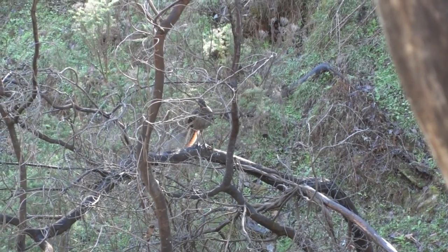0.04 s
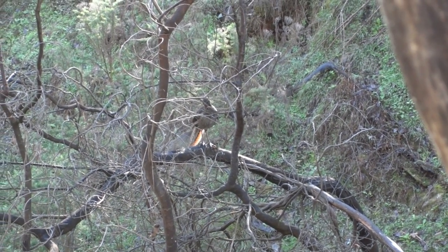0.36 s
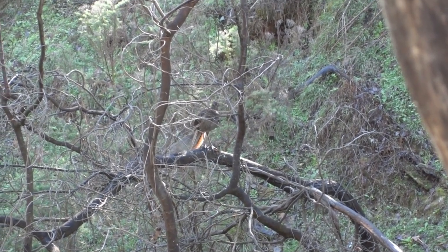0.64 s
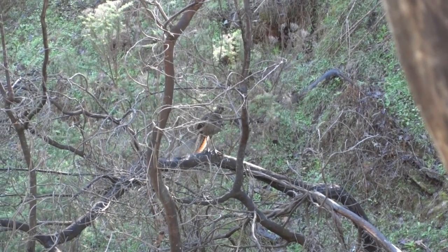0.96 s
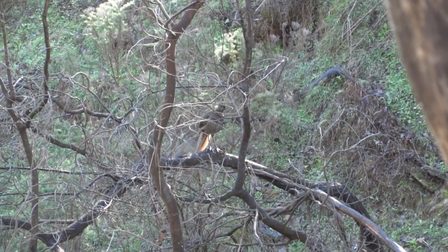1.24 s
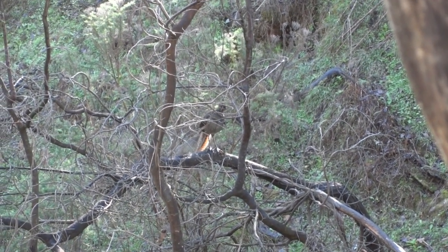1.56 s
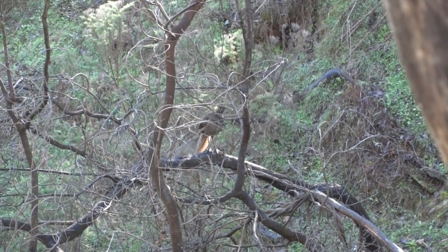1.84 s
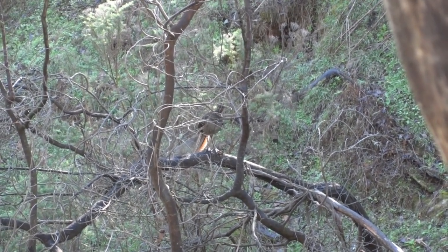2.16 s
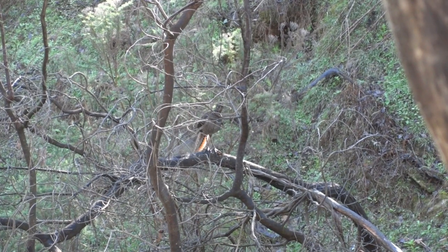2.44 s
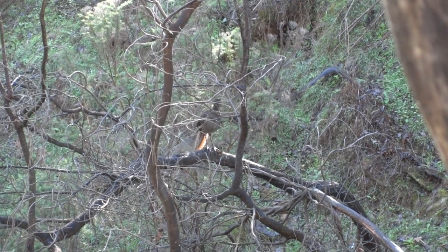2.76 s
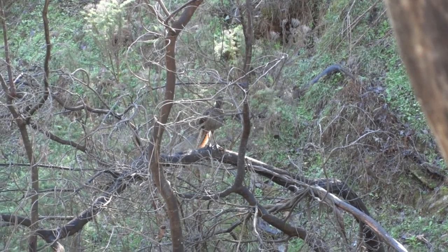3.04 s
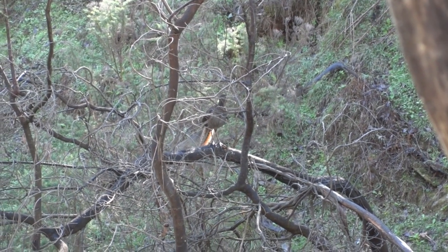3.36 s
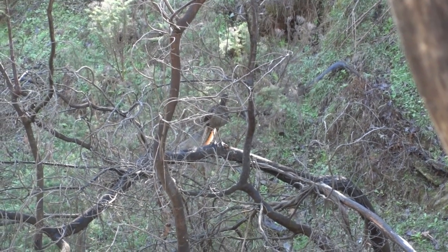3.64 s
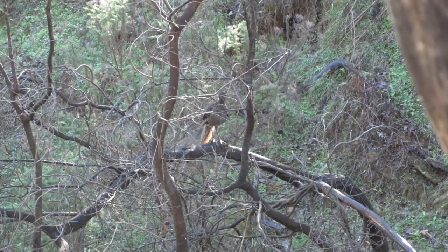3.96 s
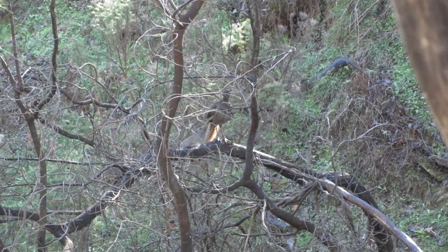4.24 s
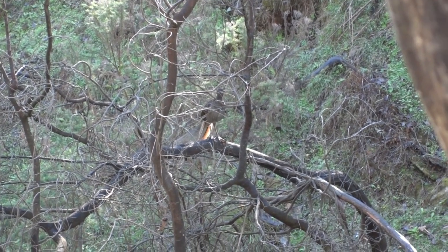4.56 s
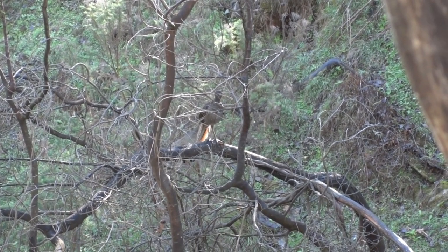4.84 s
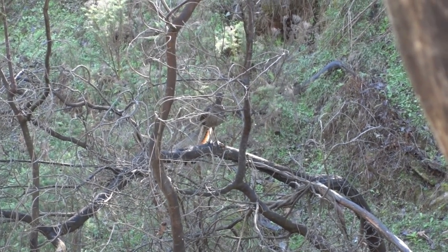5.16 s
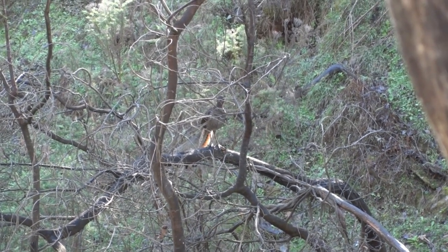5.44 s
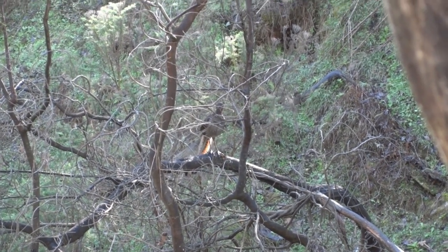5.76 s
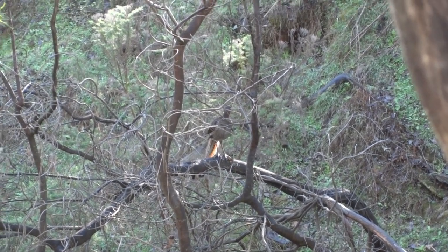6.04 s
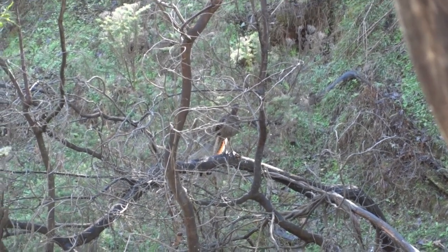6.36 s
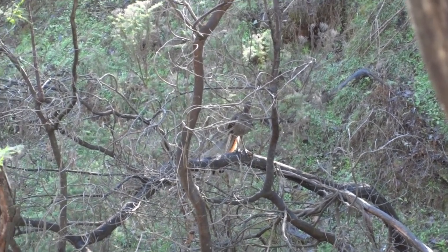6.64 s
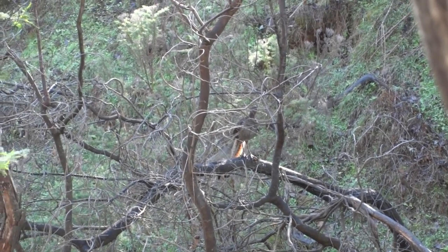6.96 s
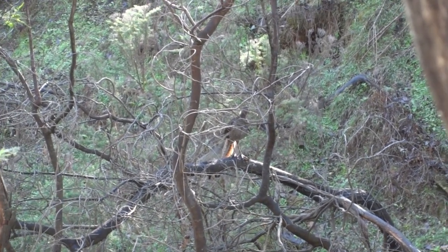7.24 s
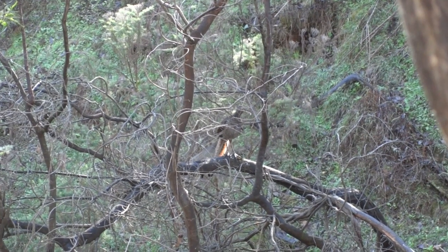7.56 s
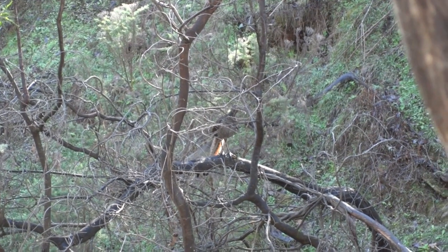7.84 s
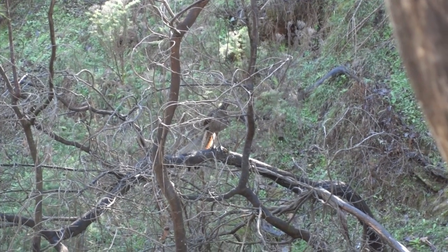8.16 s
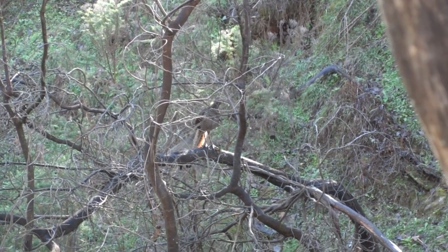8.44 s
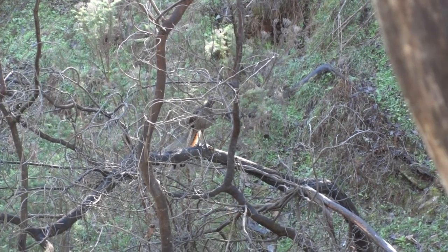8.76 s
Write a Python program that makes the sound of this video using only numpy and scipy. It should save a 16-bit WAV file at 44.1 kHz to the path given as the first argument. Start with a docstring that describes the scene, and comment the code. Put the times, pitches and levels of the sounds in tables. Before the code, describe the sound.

Loud, varied bird calls ring out in quiet woods: a hoarse cackle, clear whistles, whip-like sweeps and bill snaps.

```python
"""A wooded gully, a stereo pair facing a lyrebird on its branch. A faint low stir of air comes first.
Soft grunts speed up into a cackle, then come two yelps, a long whistle, two whip cracks, a swoop, chips,
a swelling whistle and two snaps of the bill. Last, small birds tick, chirp and rattle far off.
The voice is a vibrating membrane shaped by throat and bill; trunks and slopes scatter every note."""
import sys
import numpy as np
from scipy import signal
from scipy.fft import rfft, irfft, next_fast_len
from scipy.io import wavfile
from scipy.ndimage import uniform_filter1d

SR = 44100
rng = np.random.default_rng(int(sys.argv[2]) if len(sys.argv) > 2 else 0)


def log_audio(samples):
    """Write samples as a 16-bit WAV file to the path given in sys.argv[1]."""
    # one column per channel
    frames = np.atleast_2d(samples).T
    # limit to full scale, then quantise
    limited = np.clip(frames, -1, 1)
    pcm = np.round(limited * 32767).astype(np.int16)
    wavfile.write(sys.argv[1], SR, pcm)


N = 388521
EDGE_HZ = 15700


def amp(db):
    """Decibels to gain."""
    return 10 ** (np.asarray(db) / 20)


def unit(x):
    """Scales to an rms of one."""
    return x / np.sqrt(np.mean(x ** 2) + 1e-20)


def read(points, hz):
    """Reads rows (f/Hz, value) on a log-frequency axis."""
    f, value = np.transpose(points)
    return np.interp(np.log(hz + 1), np.log(f + 1), value)


def add(mix, s, sound):
    """Adds a sound into the mix at time s."""
    part = mix[max(round(s * SR), 0):][:len(sound)]
    part += sound[:len(part)]


def noise(colour, size):
    """Noise with the given spectral shape and an rms of one."""
    padded = next_fast_len(size, True)
    gain = amp(read(colour, np.fft.rfftfreq(padded, 1 / SR)))
    return unit(irfft(rfft(rng.standard_normal(padded)) * gain, padded)[:size])


def wobble(rate_hz, size):
    """Random motion, mostly slower than the given rate."""
    steps = next_fast_len(size // 16 + 256, True)
    hz = np.fft.rfftfreq(steps, 16 / SR)
    motion = unit(irfft(rfft(rng.standard_normal(steps)) / (1 + (hz / rate_hz) ** 4), steps))
    return np.interp(np.arange(size) / 16, np.arange(steps), motion)


def follow(path):
    """Turns rows (t/s, values..) into one gently rounded curve a column."""
    s, *columns = np.transpose(path)
    s = np.sort(s)
    t = np.arange(s[0], s[-1] + .002, 1 / SR)
    return [uniform_filter1d(np.interp(t, s, c), size=90) for c in columns]


def progress(length):
    """Runs from zero to one over a note of the given length."""
    return np.linspace(0, 1, int(length * SR))


def edges(u, attack, release):
    """Zero while a note holds, one at its ends; attack and release are shares of its length."""
    return np.maximum(1 - u / attack, 0) + np.maximum(1 - (1 - u) / release, 0)


# Low swells in the air: middle t/s, length/s, centre f/Hz, level/dB
AIR_SWELLS = [(.05, .5, 215, -61), (0.396, 1.0, 112, -73), (.8, 1.05, 256, -64), (3.494, 0.83, 278, -71.5),
              (4.4, 1.3, 89, -68), (4.5, 1.4, 226.3, -67), (5.6, 1.6, 226, -69), (6.301, 1.4, 70, -74),
              (7.7, .5, 255, -72), (8.75, .6, 210, -70)]


def swells(skirt_db=-17):
    """Bands of low noise that rise and sink again, steeper on the treble side."""
    out = np.zeros(N)
    for s, length, hz, db in AIR_SWELLS:
        band = [(hz / 4, 3 * skirt_db), (hz / 2, skirt_db), (hz, 0),
                (hz * 2, 2 * skirt_db), (hz * 4, 4 * skirt_db)]
        u = np.clip((np.arange(N) / SR - s) / length, -.5, .5)
        out += amp(db) * np.cos(np.pi * u) * noise(band, N)
    return out


# Spectra of the gully's hush, murmur and rumble: f/Hz, relative level/dB
HUSH_SPECTRUM = [(12, -33.5), (20, -3.5), (74, -8), (171, -18.5), (252, -13), (289, -17), (491, -18),
                 (581, -19), (767, -21), (2150, -24.5), (2330, -25.5), (4680, -28.5), (15500, -38)]
MURMUR_SPECTRUM = [(60, -35.5), (130, -5.5), (200, -1.5), (260, -4), (315, -6), (400, -18), (900, -50)]
RUMBLE_SPECTRUM = [(20, -10.5), (45, -8.5), (75, 4), (110, 0), (200, -19.5), (500, -55.5)]
# How alike the air is at the two microphones: f/Hz, correlation/0-1
AIR_CORRELATION = [(30, 0.39), (70, 1), (180, 1), (260, 0.21), (500, .55), (1500, .6), (5000, 0.42),
                   (12000, 1)]


def air(hush_db=-72.5, rise_db=7.5, peak_s=4.14, width_s=4.5, murmur_db=-75, waver_db=2.46,
        rumble_db=-79):
    """All around the microphones: a hush that rises and sinks over a wavering murmur and a rumble."""
    rise = rise_db * np.exp(-((np.arange(N) / SR - peak_s) / width_s) ** 2)
    layers = [(hush_db + rise, HUSH_SPECTRUM),
              (murmur_db + waver_db * wobble(6.6, N), MURMUR_SPECTRUM),
              (rumble_db, RUMBLE_SPECTRUM)]
    a, b = (swells() + sum(amp(db) * noise(colour, N) for db, colour in layers) for _ in range(2))
    likeness = read(AIR_CORRELATION, np.fft.rfftfreq(N, 1 / SR))
    mid = irfft(rfft(a) * np.sqrt((1 + likeness) / 2), N)
    side = irfft(rfft(b) * np.sqrt((1 - likeness) / 2), N)
    return np.array([mid + side, mid - side])


def syrinx(hz, rough, strength, jitter=.09, shimmer=.81, flutter_hz=380, patchy_db=4, patchy_hz=45):
    """A vibrating membrane: harmonics weighted by strength(k, Hz); roughness shakes pitch and force."""
    size = len(hz)
    pitch = hz * (1 + jitter * rough * wobble(flutter_hz, size))
    phase = 2 * np.pi * np.cumsum(pitch) / SR
    k = np.arange(1, min(EDGE_HZ / hz.min(), 20))[:, None]
    # overtones fade in and out on their own, the high ones most
    drift = np.array([wobble(patchy_hz, size) for _ in k])
    fading = amp(patchy_db * np.minimum((k - 1) / 6, 1) * drift)
    weights = fading * strength(k, k * hz) * (k * hz < EDGE_HZ)
    partials = weights * np.cos(k * phase + 2 * np.pi * rng.random(k.shape))
    # turbulence shakes the harmonics partly together, partly each on its own
    shake = (wobble(flutter_hz, size) + 2.1 * np.array([wobble(flutter_hz, size) for _ in k])) / 2
    force = 1 + shimmer * rough * shake
    return np.sqrt(2) * (partials * force).sum(0) * signal.windows.tukey(size, min(180 / size, 1))


def throat(x, colour):
    """Passes a sound through resonances given as a gain over frequency, keeping its loudness even."""
    size = next_fast_len(len(x) + 2048, True)
    voice = irfft(rfft(x, size) * colour(np.fft.rfftfreq(size, 1 / SR)), size)[:len(x)]
    return voice / np.sqrt(abs(uniform_filter1d(voice ** 2, size=800)) + 1e-12)


# Grunts from the branch: middle t/s, level/dB, length/s
GRUNT_PULSES = [(0.497, -67, 0.089), (0.57, -62.5, 0.12), (0.734, -59.5, 0.045), (0.777, -56.5, 0.034),
                (0.81, -54, .028), (.847, -53.5, 0.03), (0.877, -50.5, .025), (.916, -51, 0.03),
                (.968, -52, 0.038), (.999, -49, .028), (1.021, -51, 0.023), (1.039, -45, 0.016),
                (1.054, -45.5, .022), (1.065, -43.5, 0.021)]
# The bill opens steadily and lifts the throat resonance: t/s, f/Hz
BILL_RESONANCE = [(.74, 950), (.88, 1220), (1.05, 1440)]
# Upper throat resonances: f/Hz, width/Hz, gain/dB
UPPER_RESONANCES = [(5100, 1100, -28.5), (7600, 480, -34), (9700, 940, -34.5)]


def grunts(start_hz=900, end_hz=660, rough=.64, width_hz=310, body_db=-14):
    """Short hoarse falling pulses; the nearly closed bill lets one strong resonance through."""
    out = np.zeros(N)
    for s, db, length in GRUNT_PULSES:
        hz = np.geomspace(start_hz, end_hz, int(length * SR))
        bill_hz = np.interp(s, *np.transpose(BILL_RESONANCE))
        peaks = [(bill_hz, width_hz, 0), (850, 200, body_db)] + list(UPPER_RESONANCES)
        buzz = syrinx(hz, rough, lambda k, f: 1)
        voice = throat(buzz, lambda f: sum(amp(gain) / (1 + ((f - centre) / width) ** 2) ** 1.42
                                           for centre, width, gain in peaks))
        add(out, s - length / 2, amp(db) * voice * signal.windows.tukey(len(hz), .9))
    return out


# Reedy notes: t/s, length/s, top f/Hz, place of top/0-1, level/dB, edge and middle roughness/0-1
CACKLE_NOTES = [ (.582, 0.042, 987, 0.35, -64, 0.9, 1), (1.024, .09, 750, .4, -55.5, 0.7, .5),
                (1.128, 0.047, 767, 0.34, -44, 0.77, 0.5), (1.214, 0.056, 731, 0.36, -43, .6, 0.52),
                (1.303, 0.057, 731, .6, -43, 0.5, 0.9), (1.389, 0.094, 813, 0.37, -42, 0.54, .04),
                (1.515, 0.086, 813, 0.29, -41.5, 0.26, 0.22), (1.638, 0.099, 815, .33, -42, 0.43, 0.02),
                (1.761, .114, 826.6, .53, -43.5, 0.4, 0.08), (4.716, .05, 685, .9, -60.5, 0, 0.1),
                (4.805, .046, 1130, 0.32, -47, .1, 0.1), (4.848, 0.028, 902, 0.07, -52, 0.2, 0.2),
                (5.156, .033, 1020, .05, -38, 0.7, 0.57), (5.499, .024, 1395, .95, -53.5, 0.26, .1), ]
# Throat resonances with the bill open: f/Hz, gain/dB
OPEN_THROAT = [(500, -0.5), (780, 4), (1130, -1), (1520, 2), (2250, 3.5), (2900, -7), (3900, -7.5),
               (4400, -23), (4900, -17), (5600, -31), (6300, -25), (6950, -27.5), (7500, -15), (8400, -27),
               (9000, -17.5), (9600, -30.5), (10300, -21), (11000, -28.5), (14500, -37)]


def cackles(arch=.68, rasp=.4, rasp_hz=210, hoarse_fundamental_db=-11, fade_db=-13, clearing=.25,
            last_hoarse=.13):
    """Open-billed notes that start hoarse and clear as the pitch arches; a slower flutter adds rasp."""
    out = np.zeros(N)
    for s, length, top_hz, top, db, edge_rough, middle_rough in CACKLE_NOTES:
        u = progress(length)
        hz = top_hz * np.exp(-arch * (u - top) ** 2)
        hoarse = np.clip(.45 + (top - u) / clearing, 0, 1) + np.maximum(1 - (1 - u) / last_hoarse, 0)
        rough = middle_rough + (edge_rough - middle_rough) * np.minimum(hoarse, 1)
        flutter = np.sin(2 * np.pi * np.cumsum(rasp_hz * (1 + .33 * wobble(60, len(hz)))) / SR)
        # a pressed, hoarse note loses its fundamental
        buzz = syrinx(hz, rough, lambda k, f: amp(hoarse_fundamental_db * rough * (k == 1)),
                      jitter=.095, patchy_db=3)
        buzz *= 1 + rasp * np.sqrt(abs(rough)) * flutter
        voice = throat(buzz, lambda f: amp(read(OPEN_THROAT, f)) / (1 + (520 / (f + 1)) ** 8))
        add(out, s, amp(db + fade_db * edges(u, attack=.3, release=.25)) * voice)
    return out


# Colour of a whistled note's overtones: f/Hz, gain/dB
OVERTONE_COLOUR = [(1500, -5.5), (3000, -1), (4300, -12.5), (4830, 1), (5600, -8.5), (6450, -9.5),
                   (7300, -6.5), (8200, -2), (9600, -5), (10800, 0), (12000, -8.5), (14400, -12),
                   (15500, -14)]


def pure(hz, db, overtone_db, rough, growth=.98, knee=5, roll_off_db=4, held_odd_db=-13, held_range=.062):
    """A whistled note: the throat tracks the fundamental, so the overtones stay faint."""
    base_db = overtone_db + growth * (db - db.max())
    odd_db = held_odd_db * np.exp(-(np.log(hz).std() / held_range) ** 2)  # held notes favour even ones

    def strength(k, f):
        upper_db = base_db + read(OVERTONE_COLOUR, f) + odd_db * (k % 2)
        upper_db -= roll_off_db * np.maximum(k - knee, 0)
        return amp(np.where(k == 1, db, upper_db))
    return syrinx(hz, rough, strength)


# Slurs: t/s, length/s, first, middle and last f/Hz, level/dB, overtones/dB, roughness/0-1
SLUR_NOTES = [ (.587, .028, 2765, 3010, 2850, -64.5, -76, 0.74),
              (2.511, 0.01, 820, 1195, 1550, -47, -70.5, 0.18),
              (2.607, 0.0076, 1770, 2230, 2440, -45.5, -68.5, .1),
              (2.645, 0.021, 1044, 820, 746, -50.5, -67.5, 0),
              (2.878, 0.055, 2360, 2430, 2510, -48, -76, 0),
              (2.925, 0.064, 2510, 2505, 2450, -49.5, -70, 0),
              (3.69, 0.0095, 7110, 7200, 6500, -50.5, -65, 0),
              (3.945, 0.026, 4300, 6000, 5400, -50.5, -65, 0.12),
              (4.069, 0.039, 900, 816, 1060, -48, -73, 0.07),
              (4.946, .034, 900, 2800, 3650, -52.5, -72.5, 0.1),
              (5.152, 0.016, 1878, 1556, 1071, -39.5, -58, .25),
              (5.642, 0.018, 2520, 2070, 1960, -30.5, -62.5, 0.07),
              (5.659, 0.043, 1910, 1910, 1950, -35.5, -69.5, 0.03),
              (6.009, 0.0452, 3194, 3370, 3280, -44.5, -58.5, 0.33),
              (6.01, 0.044, 3720, 3860, 3520, -50, -69, 0.53), ]


def slurs(fade_db=-10):
    """Short notes before and after the big ones, each one smooth bend of pitch."""
    out = np.zeros(N)
    for s, length, first_hz, middle_hz, last_hz, db, overtone_db, rough in SLUR_NOTES:
        u = progress(length)
        bend = np.polyfit([0, .5, 1], np.log([first_hz, middle_hz, last_hz]), 2)
        hz = np.exp(np.polyval(bend, u))
        add(out, s, pure(hz, db + fade_db * edges(u, attack=.44, release=.59), overtone_db, rough))
    return out


# Chirps of a small bird, far off: t/s, f/Hz, level/dB
FAR_CHIRPS = [(.645, 7840, -75), (3.421, 7300, -71.5), (4.91, 7400, -73), (6.38, 8400, -75),
              (6.43, 8400, -75), (6.94, 7700, -79), (7.06, 7600, -82), (8.62, 8300, -81),
              (8.675, 8400, -78), (8.75, 8200, -79)]
# Dry ticks, also far off: t/s, relative level/dB
FAR_TICKS = [(6.8197, -55.5), (6.886, -58), (6.9199, -62), (6.9459, -61), (7.0197, -57), (7.0531, -64),
             (7.0868, -58), (7.2866, -60), (7.3535, -60), (7.4532, -58)]


def small_birds(fall=.88, chirp_s=.03, tick_db=-10, tick_hz=4300, tick_spread=1.38, tick_s=.0095):
    """Thin falling chirps, and a spell of uneven ticking: sweeps too short to have a pitch."""
    def sweep(first_hz, last_hz, length):
        hz = np.geomspace(first_hz, last_hz, int(length * SR))
        return np.sqrt(2) * np.sin(2 * np.pi * np.cumsum(hz) / SR) * np.hanning(len(hz))
    out = np.zeros(N)
    for s, hz, db in FAR_CHIRPS:
        add(out, s, amp(db) * sweep(hz * 1.03, hz * fall, chirp_s))
    for s, db in FAR_TICKS:
        add(out, s, amp(db + tick_db) * sweep(tick_hz * tick_spread, tick_hz / tick_spread, tick_s))
    return out


# Yelps from the branch: t/s, length/s, middle f/Hz, level/dB
YELP_NOTES = [(2.524, .038, 1306, -33.5), (2.616, .041, 1390, -30)]


def yelps(fall_octaves=.4, end_fall_octaves=.36, fade_db=-23):
    """Quick falling notes, steepest at both ends."""
    out = np.zeros(N)
    for s, length, middle_hz, db in YELP_NOTES:
        u = progress(length)
        hz = middle_hz * 2 ** (fall_octaves * (1 - 2 * u) + end_fall_octaves * (1 - 2 * u) ** 3)
        level = db + fade_db * edges(u, attack=.28, release=.47)
        add(out, s, pure(hz, level, overtone_db=-62, rough=.032))
    return out


# The long whistle and the swelling last one: t/s, f/Hz, level/dB
LONG_WHISTLE_PATH = [(2.965, 2530, -52), (2.983, 2394, -36.5), (3.033, 2374, -37.5), (3.127, 2395, -31),
                     (3.189, 2423, -35), (3.243, 2414, -29.5), (3.351, 2353, -30.5), (3.36, 2320, -42)]
LAST_WHISTLE_PATH = [(5.688, 1934, -38), (5.708, 2080, -27), (5.742, 2155, -23.5), (5.774, 2141, -20.5),
                     (5.788, 2128, -22), (5.8, 2176, -32)]


def whistles(long_overtone_db=-63.5, last_overtone_db=-57.5):
    """Two held notes that swell on a nearly steady pitch."""
    out = np.zeros(N)
    for path, overtone_db in (LONG_WHISTLE_PATH, long_overtone_db), (LAST_WHISTLE_PATH, last_overtone_db):
        add(out, path[0][0], pure(*follow(path), overtone_db, rough=.009))
    return out


# Loudness of the rising and the falling whip crack: t/s, level/dB
RISING_WHIP = [(3.555, -61), (3.578, -45.5), (3.62, -36.5), (3.637, -29.5), (3.644, -35), (3.656, -24.5),
               (3.672, -30.5), (3.68, -32.5), (3.691, -38)]
FALLING_WHIP = [(3.975, -50), (3.982, -37), (3.993, -36.5), (4.012, -32), (4.028, -29), (4.038, -29),
                (4.047, -28.5), (4.06, -36), (4.071, -48.5)]


def whip(path, first_hz, last_hz, bend, overtone_db, rough):
    """One wide whistled sweep. At bend 1 the pitch moves evenly; at -1 the period does."""
    out, (db,) = np.zeros(N), follow(path)
    start, end = path[0][0], path[-1][0]
    u = np.minimum(np.arange(len(db)) / SR / (end - start), 1)
    hz = first_hz * (1 + u * ((last_hz / first_hz) ** bend - 1)) ** (1 / bend)
    add(out, start, pure(hz, db, overtone_db, rough))
    return out


# Loudness of the swoop: t/s, level/dB
SWOOP_LEVEL = [(4.977, -57), (4.99, -46), (5.015, -30.5), (5.04, -37.5), (5.06, -29.5), (5.08, -26.5),
               (5.1, -35), (5.15, -38), (5.156, -44.5)]


def swoop(top_hz=3720, rest_hz=1695, settle_s=.07):
    """A whistle that drops fast, then levels out."""
    out, (db,) = np.zeros(N), follow(SWOOP_LEVEL)
    hz = rest_hz + (top_hz - rest_hz) * np.exp(-np.arange(len(db)) / SR / settle_s)
    add(out, SWOOP_LEVEL[0][0], pure(hz, db, overtone_db=-57, rough=.01))
    return out


# Yodelled chips: t/s at the top, fall/s, top f/Hz, last f/Hz, level/dB late in the fall
CHIP_NOTES = [(5.555, .018, 3840, 2450, -30), (5.605, .036, 4090, 2915, -43)]


def chips(croak_hz=760, croak_s=.0085, leap_s=.011, croak_db=-48, top_db=-40, last_db=-50):
    """The voice croaks low, breaks upwards and slides back down."""
    out = np.zeros(N)
    for s, fall, top_hz, last_hz, db in CHIP_NOTES:
        t = np.arange(-croak_s - leap_s, fall, 1 / SR)
        hz = np.interp(t, [-leap_s, 0, fall], [croak_hz, top_hz, last_hz])
        level = np.interp(t, [-leap_s, 0, .81 * fall, fall], [croak_db, top_db, db, last_db])
        add(out, s + t[0], pure(hz, level, overtone_db=-54, rough=.1))
    return out


# Bill snaps: t/s, level/dB
BILL_SNAPS = [(5.799, -38.5), (6.101, -47)]
# Their spectrum: f/Hz, relative level/dB
SNAP_SPECTRUM = [(500, -7.5), (3000, 5.5), (5300, 3.5), (7000, -7), (10500, -1), (15000, -12)]


def snaps(decay_s=.0033):
    """The bill clacks shut in a short burst of noise."""
    out, t = np.zeros(N), np.arange(1024) / SR
    envelope = t / decay_s * np.exp(1 - 2 * t / decay_s)
    for s, db in BILL_SNAPS:
        add(out, s, amp(db) * noise(SNAP_SPECTRUM, len(t)) * envelope)
    return out


# Dull bumps, alike in both microphones: t/s, level/dB, f/Hz
LOW_BUMPS = [(6.3, -59, 35.2), (6.84, -68, 54), (6.945, -57, 45), (7.0, -59, 55)]


def bumps(decay_s=.017):
    """Soft thuds, each a low tone that dies within a few cycles."""
    out, t = np.zeros(N), np.arange(SR // 4) / SR
    envelope = t / decay_s * np.exp(1 - t / decay_s)
    for s, db, hz in LOW_BUMPS:
        add(out, s, amp(db) * np.sin(2 * np.pi * hz * t) * envelope)
    return out


# A bird far down the gully: t/s, f/Hz, relative level/dB
FAR_RATTLE = [(6.45, 1597, -76.5), (6.8, 1641, -81.5), (7.1, 1608, -82.5), (7.45, 1590, -95),
              (7.6, 1560, -101)]


def far_call(rough=.442):
    """A rattling note: one tone, shaken in pitch and force."""
    out = np.zeros(N)
    hz, db = follow(FAR_RATTLE)
    add(out, FAR_RATTLE[0][0], amp(db) * syrinx(hz, rough, lambda k, f: k == 1))
    return out


# Ring of the gully: f/Hz, time to fall by 60 dB/s
ECHO_T60 = [(500, .7), (1400, 0.95), (2200, 1.05), (4000, 0.98), (6000, .7), (9000, .55), (15000, .35)]
# Colour of that echo: f/Hz, gain/dB
ECHO_COLOUR = [(500, -17.5), (900, -7.5), (1500, -5.5), (2300, -6.5), (4000, 0.5), (6000, 1.5), (9000, -9),
               (15000, -10)]
# Reflections off a log and the nearest trunks: delay/s, gain/dB
TRUNK_ECHOES = [(.0016, -31.5), (.0125, -25.5), (.021, -31.5)]


def gully(x, build_up_s=.009, early_db=5, early_s=.035, far_db=-36, far_t60=3, side_db=-10):
    """Scatter from trunks and brush: a quick cloud of echoes, a tail, a faint roll off the far slopes."""
    size = 2 * SR
    taps = rng.standard_normal((2, size)) * (rng.random((2, size)) < .15)
    hz, t, spectra = signal.stft(taps, SR, nperseg=256)
    near = amp(-60 * t / read(ECHO_T60, hz)[:, None]) * amp(early_db * np.exp(-t / early_s))
    far = amp(far_db - 60 * t / far_t60 - hz[:, None] / 600)
    decay = near + far
    band_energy = (decay ** 2).sum(1, keepdims=True) * 128  # samples a frame
    decay *= amp(read(ECHO_COLOUR, hz))[:, None] / np.sqrt(band_energy)
    tail = signal.istft(spectra * decay, SR, nperseg=256)[1][:, :size] / taps.std()
    tail *= 1 - np.exp(-(np.arange(size) / SR / build_up_s) ** 2)
    mid, side = signal.fftconvolve(x[None], tail, axes=1)[:, :N]
    for delay, db in TRUNK_ECHOES:
        add(mid, delay, amp(db) * x)
    return np.array([mid + amp(side_db) * side, mid - amp(side_db) * side])


def scene(far_send_db=9):
    """The singer straight ahead of the microphones; of the farthest bird only the echo arrives."""
    whips = (whip(RISING_WHIP, first_hz=699, last_hz=7300, bend=-.97, overtone_db=-52, rough=.02)
             + whip(FALLING_WHIP, first_hz=5140, last_hz=960, bend=1.05, overtone_db=-49, rough=.03))
    # direct sound, send into the gully/dB
    calls = [(grunts() + cackles(), -2), (yelps(), -2), (whistles(), -3), (whips, .1),
             (swoop(), 1.1), (chips() + slurs(), 1), (snaps(), -5), (small_birds(), -2)]
    direct = sum(call for call, _ in calls)
    scattered = sum(amp(send_db) * call for call, send_db in calls) + amp(far_send_db) * far_call()
    return direct + gully(scattered) + bumps() + air()


def record(dry):
    """The band limit of the recorder."""
    low_pass = signal.firwin(511, EDGE_HZ, window=("kaiser", 9), fs=SR)
    return signal.oaconvolve(dry, low_pass[None], "same")


dry = scene()
out = record(dry)
log_audio(out)
```